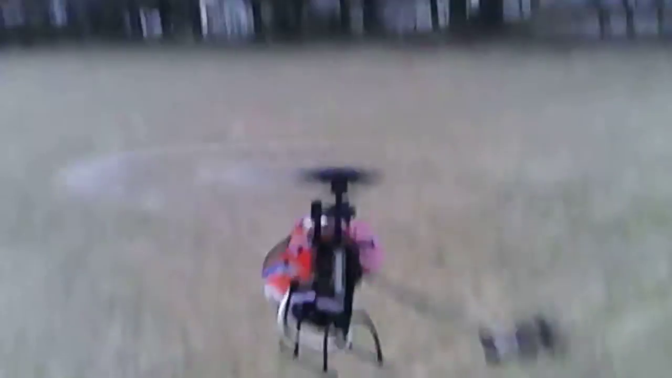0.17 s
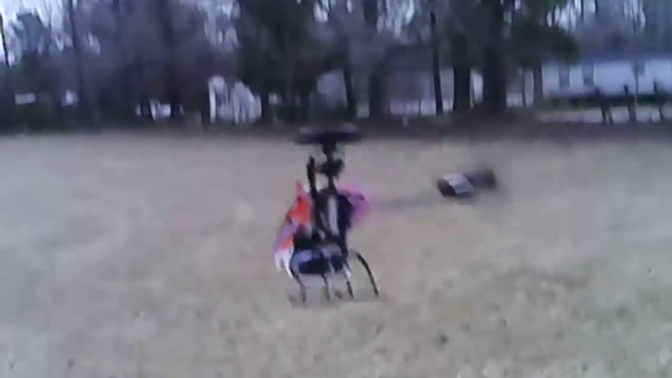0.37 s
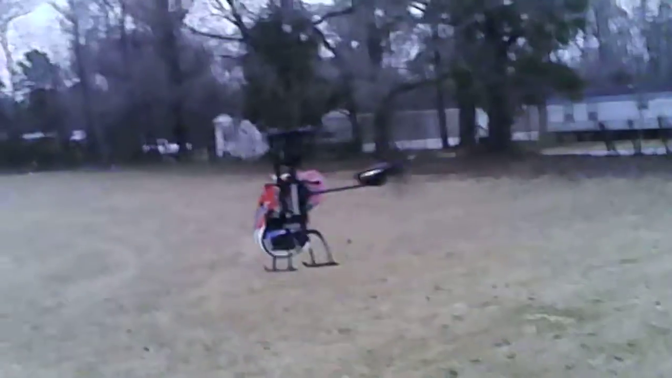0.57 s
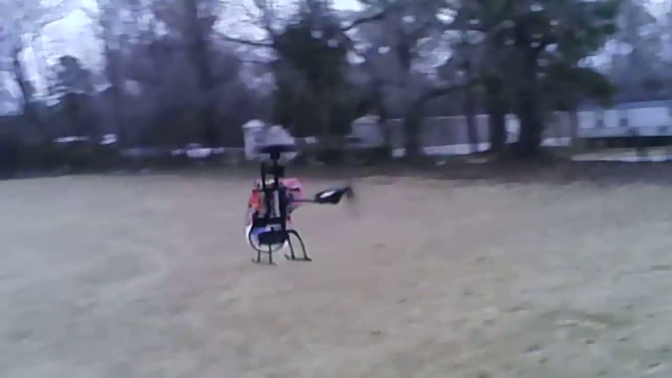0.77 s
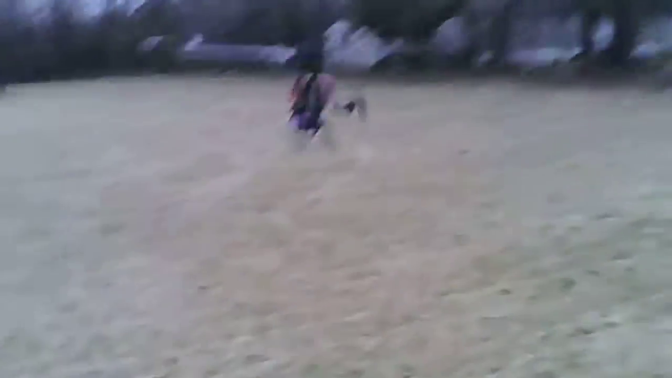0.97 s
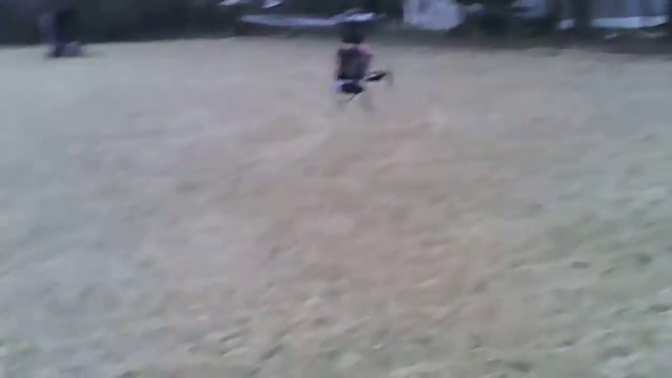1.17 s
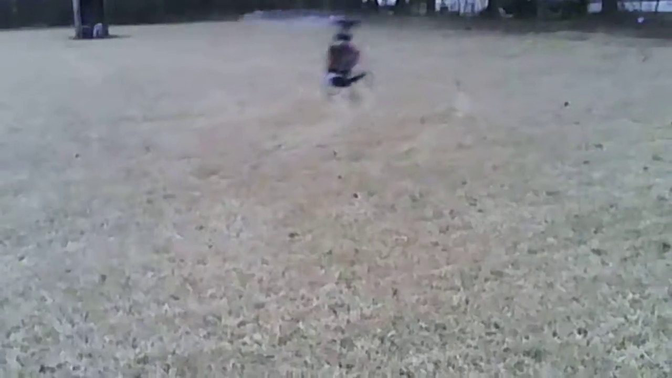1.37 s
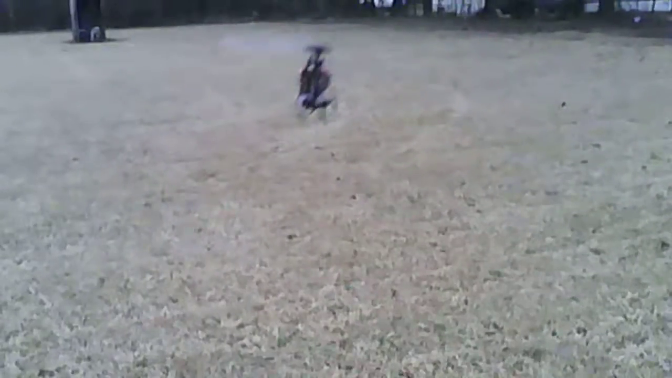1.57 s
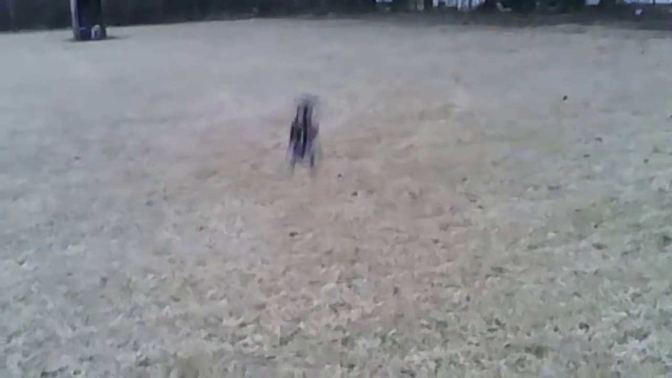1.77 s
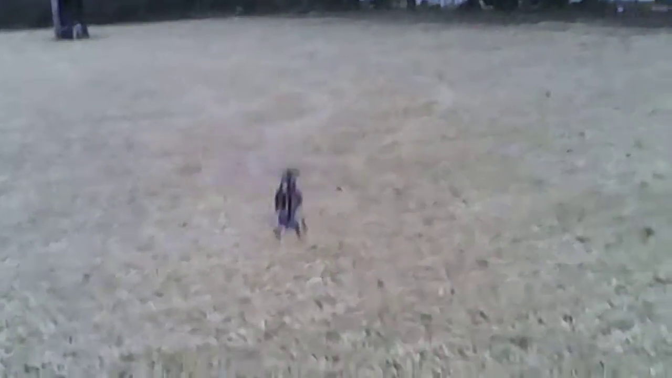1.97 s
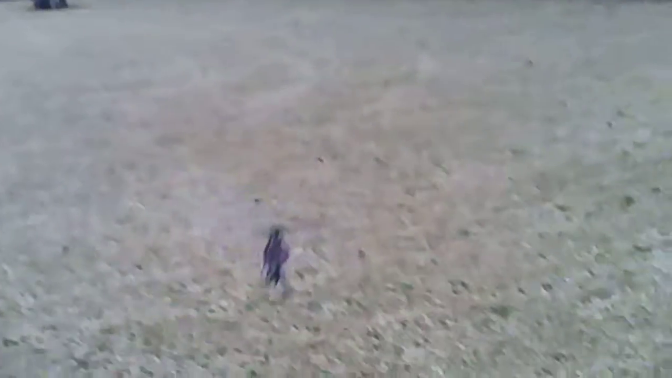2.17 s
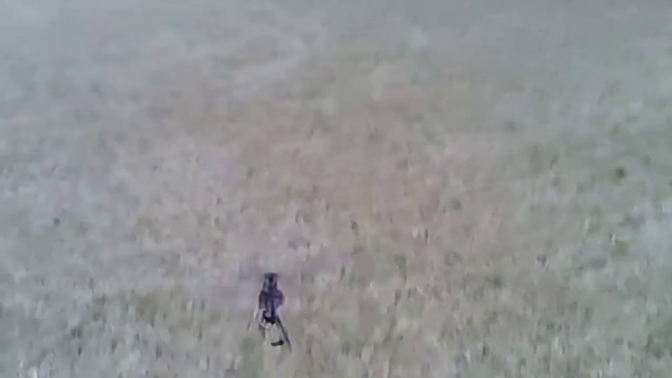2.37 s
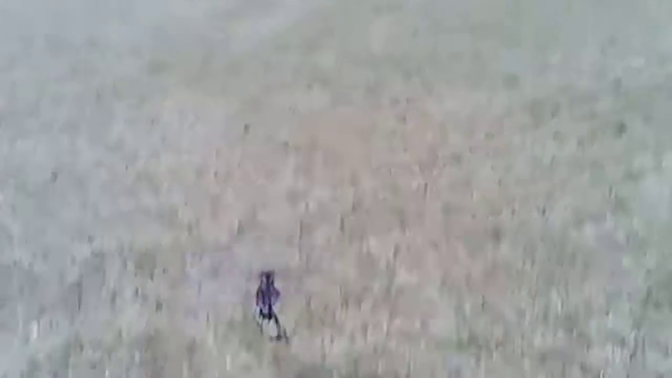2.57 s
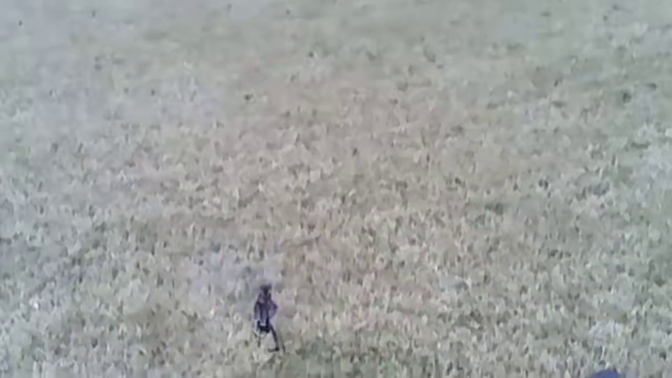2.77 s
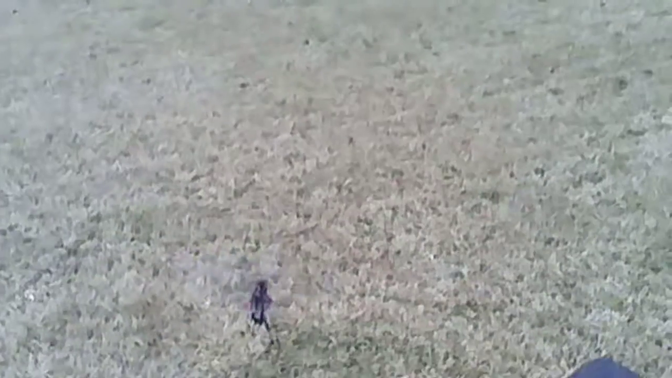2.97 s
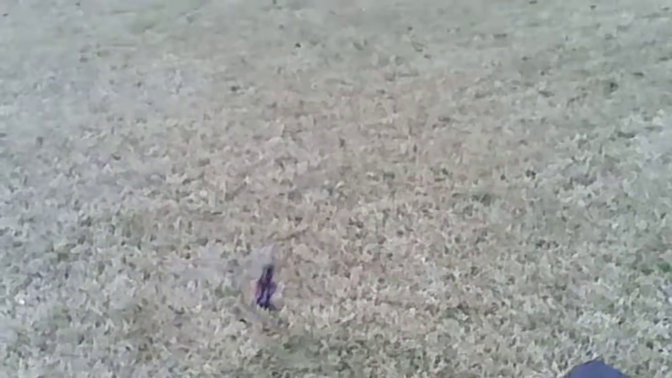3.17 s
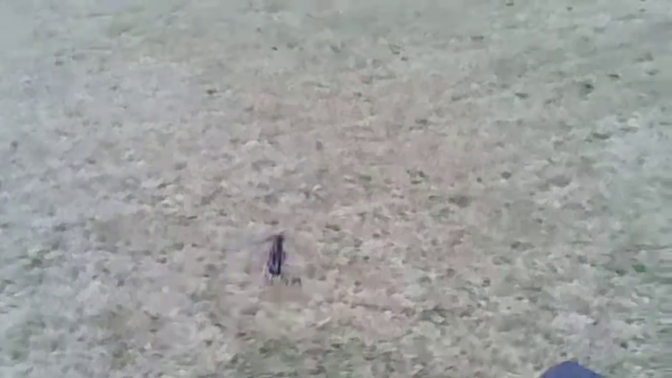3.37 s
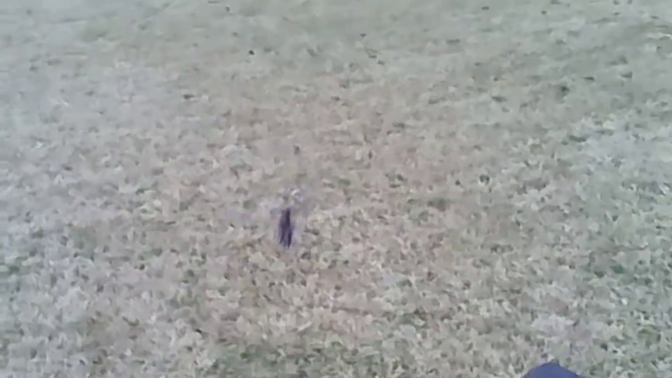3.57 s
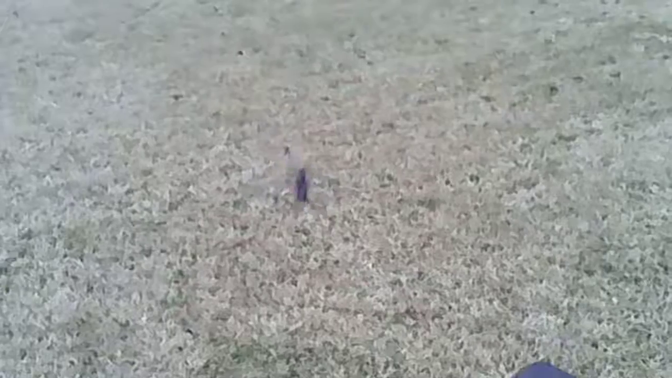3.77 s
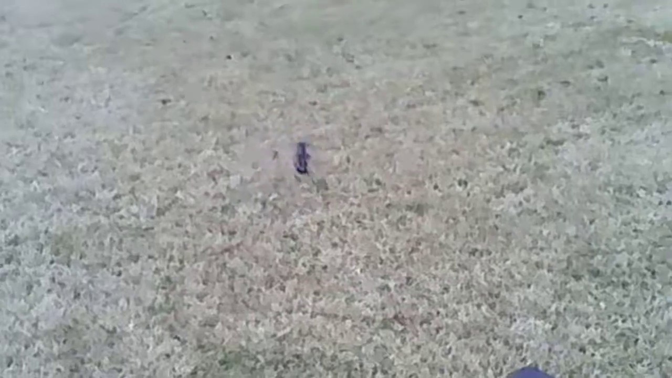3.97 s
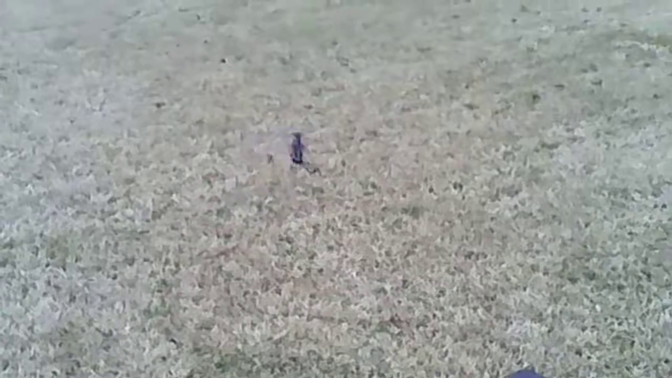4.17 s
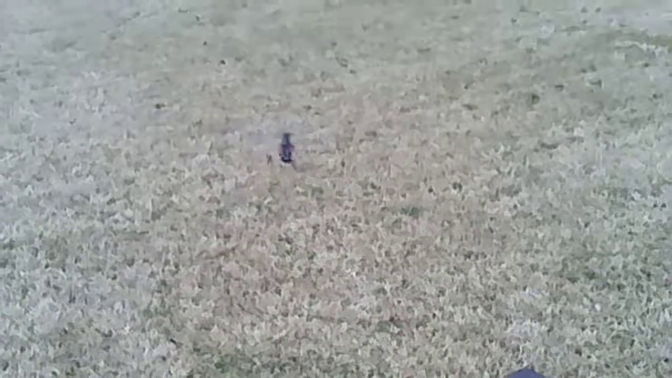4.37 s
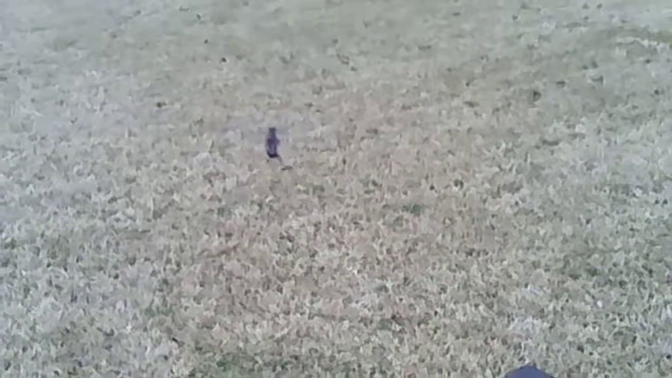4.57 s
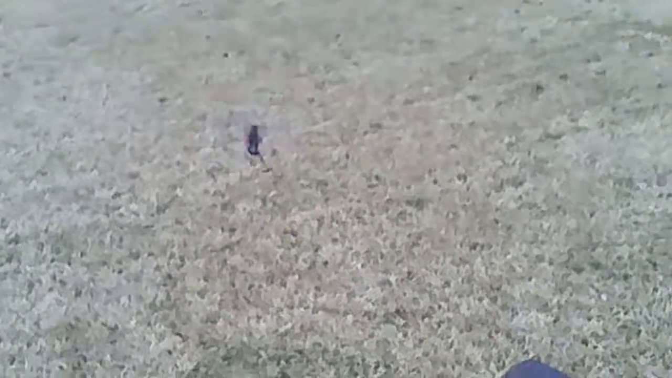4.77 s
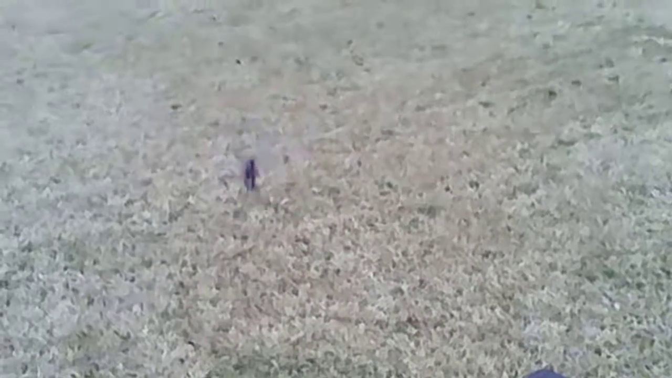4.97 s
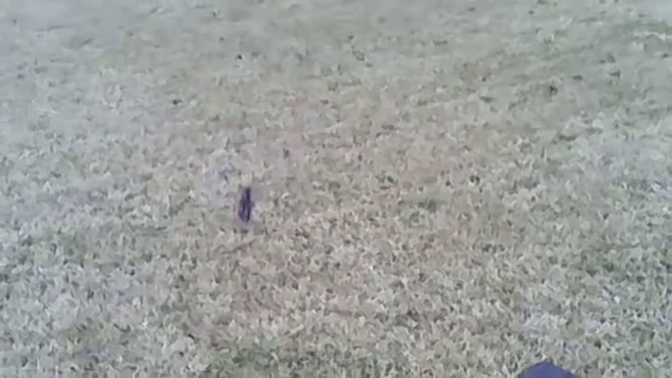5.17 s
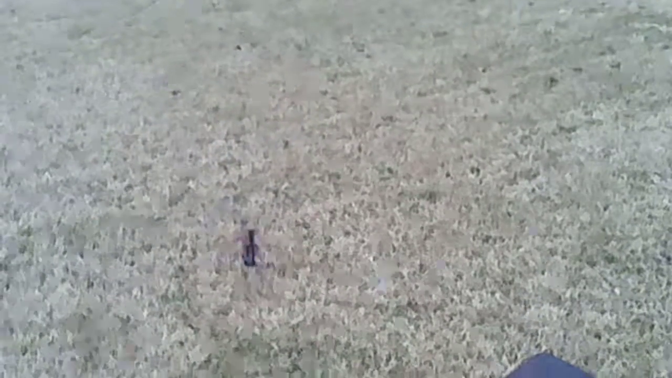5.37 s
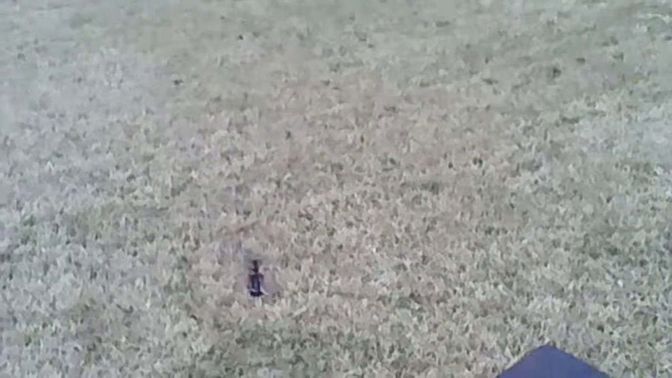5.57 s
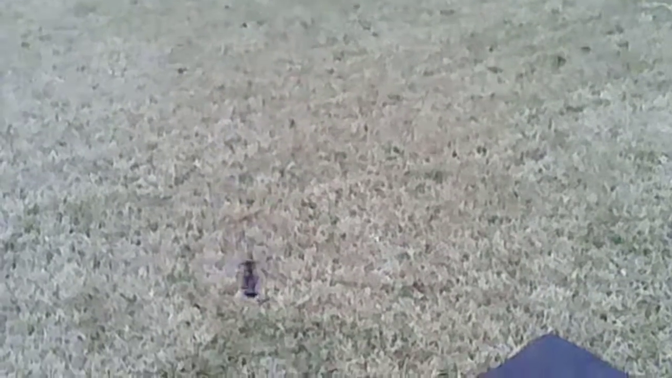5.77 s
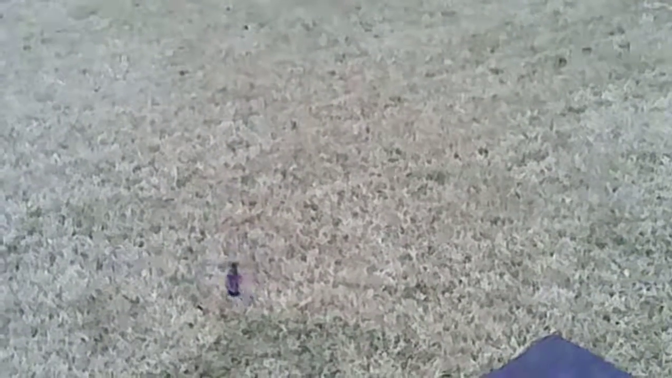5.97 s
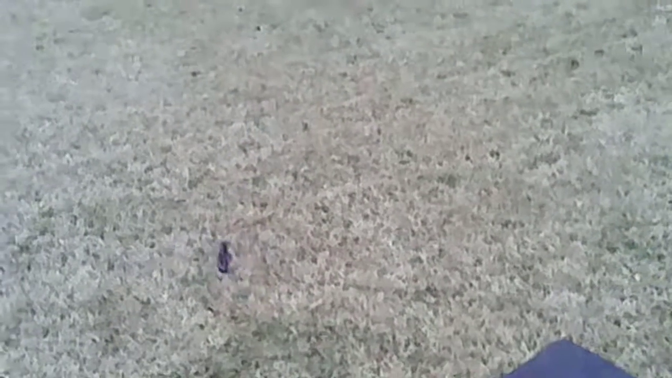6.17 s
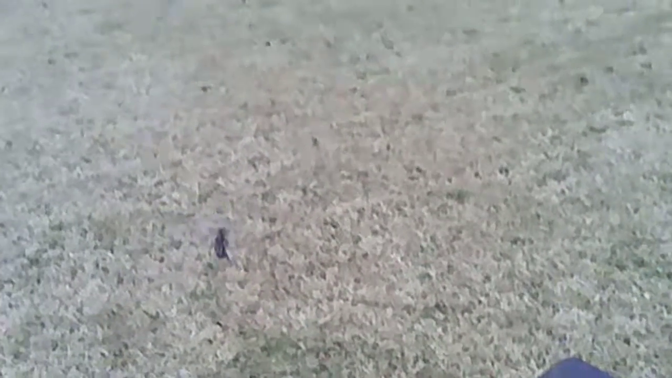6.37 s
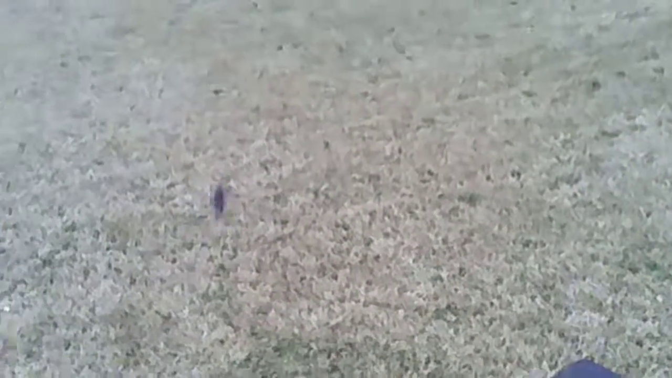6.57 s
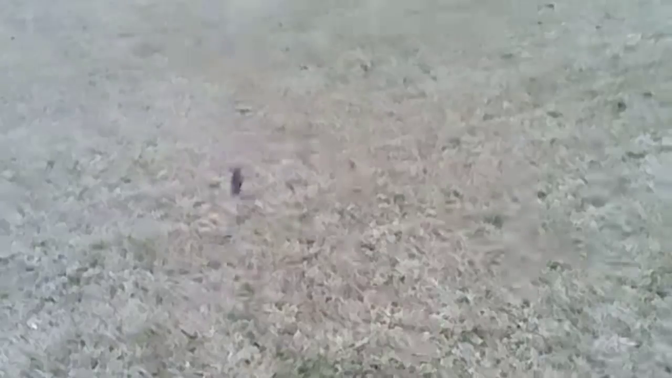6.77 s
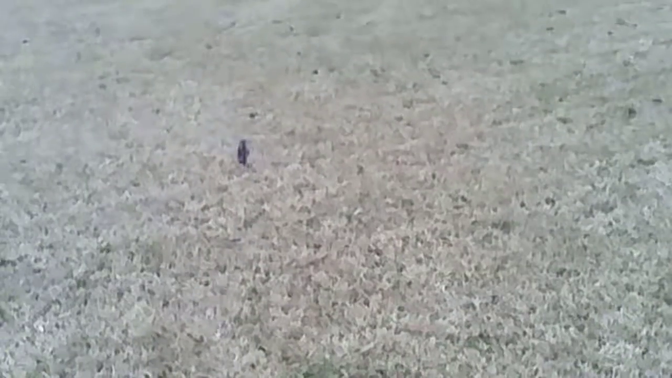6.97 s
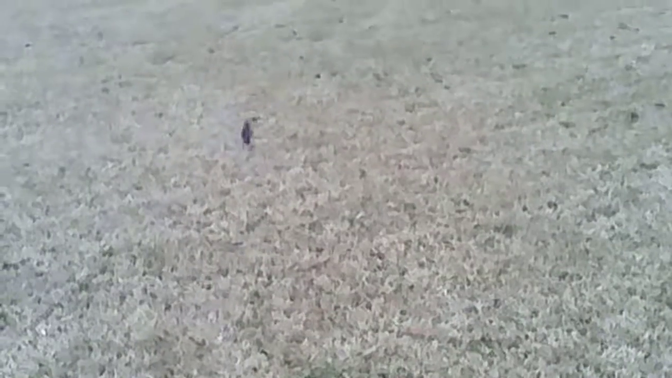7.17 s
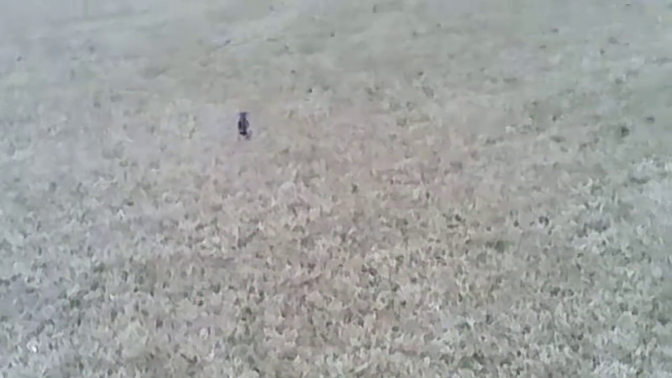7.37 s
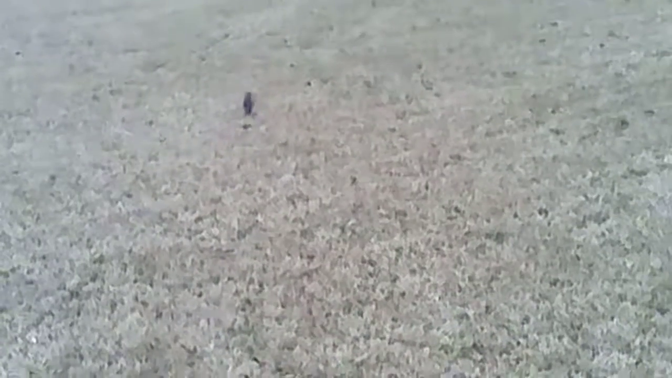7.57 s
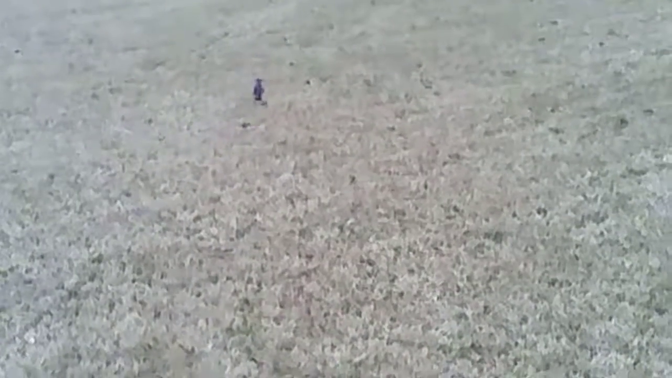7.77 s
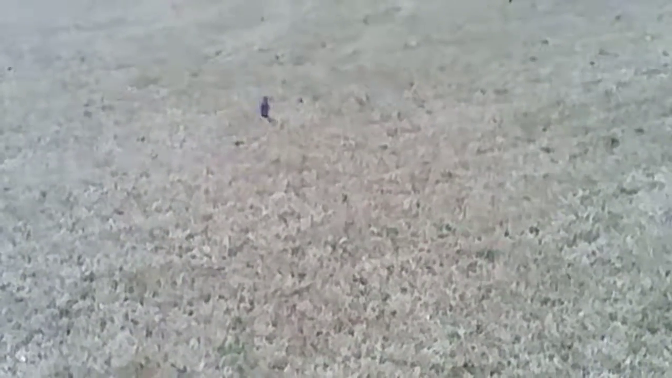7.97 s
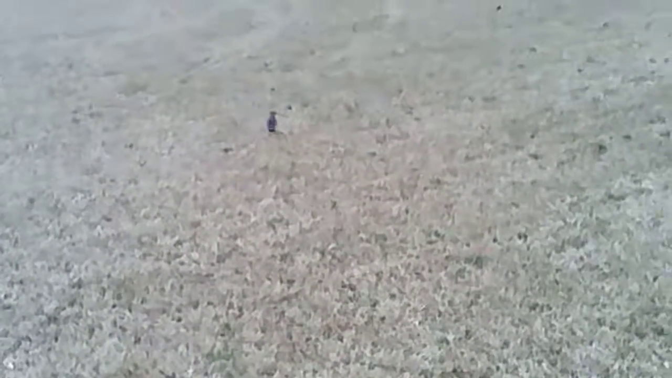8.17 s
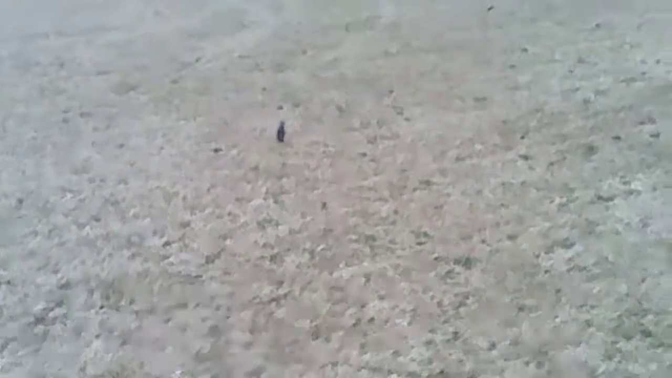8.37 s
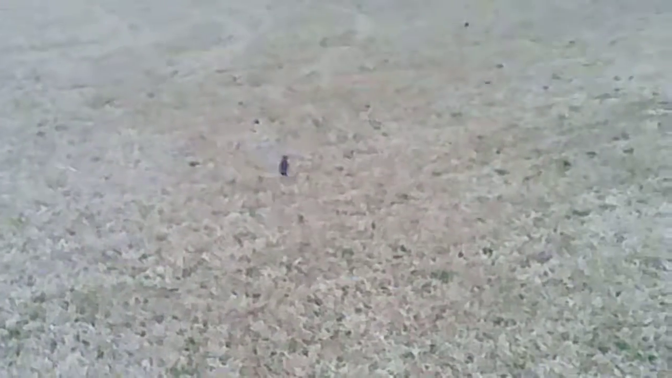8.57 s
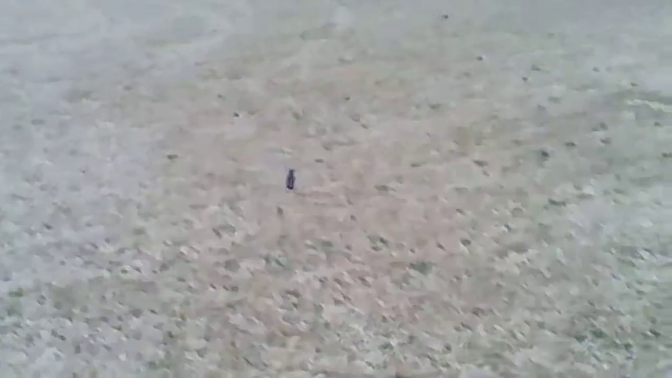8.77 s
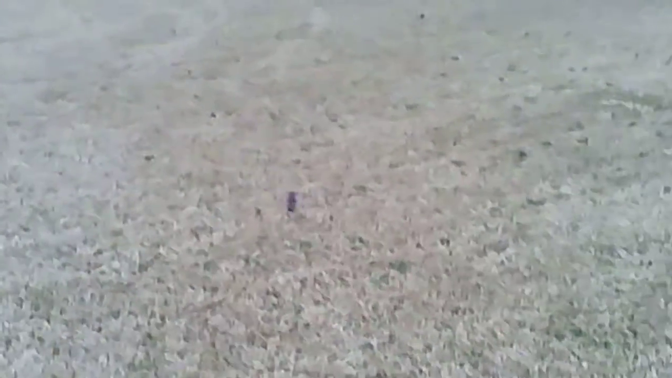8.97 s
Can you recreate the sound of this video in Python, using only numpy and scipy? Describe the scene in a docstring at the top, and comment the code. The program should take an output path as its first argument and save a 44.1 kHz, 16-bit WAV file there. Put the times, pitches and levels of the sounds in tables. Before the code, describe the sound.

The fluttering whine of a little model helicopter recedes over a lawn, with rushes of blade noise and scattered hollow knocks nearby.

```python
"""A small electric model helicopter hovers 0.7 m away over a lawn, against a faint outdoor wash and hum.
From the start its motor sings, turning eight times per rotor turn, and an off-centre 64-tooth gear
whines, flutters and rasps. The blades roar whenever it sinks into its own wake: at the outset, then
loudest at 2-3 s as it backs away. Hollow knocks sound nearby, one early and the rest from 2.4 to 5.3 s.
After hanging still near 3 m, the craft drifts off to 5 m and dips into its wake again."""
import sys
import numpy as np
from scipy import signal
from scipy.fft import rfft, irfft, next_fast_len
from scipy.io import wavfile
from scipy.ndimage import uniform_filter1d

SR = 44100
rng = np.random.default_rng(int(sys.argv[2]) if len(sys.argv) > 2 else 0)


def to_wav(s):
    """Save 16-bit WAV."""
    ch = np.atleast_2d(s).T  # columns
    pcm = np.round(np.clip(ch, -1, 1) * 32767)  # PCM
    wavfile.write(sys.argv[1], SR, pcm.astype(np.int16))


N = 397341
TIME = np.arange(N) / SR
GEAR_TEETH, MOTOR_STEPS = 64, 24  # tooth contacts and torque ripples per rotor turn

# directivity of the ringing frame toward the listener: t/s, gain/dB
FRAME_DIRECTIVITY = [(.3, 4), (1.1, -5.5), (2.6, -9.5), (3.1, -3), (3.55, -5), (4.1, -13), (4.8, -15),
                     (5.35, -3), (6.2, -3), (6.55, -6), (7.4, -11), (8.8, -3)]


def amp(db):
    """Decibel law: 20 dB is a factor of ten in amplitude."""
    return 10 ** (np.asarray(db) / 20)


def unit(x):
    """Normalisation to rms 1."""
    return x / np.sqrt(np.mean(x ** 2) + 1e-20)


def curves(rows):
    """Linear interpolation in time of each column after the first."""
    times, *columns = np.transpose(rows)
    return [np.interp(TIME, times, column) for column in columns]


def beam(rows):
    """Directivity: the gain toward the listener changes as the craft turns and tilts."""
    return amp(curves(rows)[0])


def colour(x, spectrum):
    """Spectral shaping by rows of f/Hz, gain/dB; the result has rms 1."""
    size = next_fast_len(N, real=True)
    hz, db = np.transpose(spectrum)
    bins = np.fft.rfftfreq(size, 1 / SR)
    gain = amp(np.interp(np.log(bins + 1), np.log(hz), db))
    return unit(irfft(rfft(x, size) * gain, size)[:N])


def wander(bandwidth_hz):
    """Random fluctuation: low-passed Gaussian noise of rms 1."""
    grid = np.linspace(0, TIME[-1], num=4096)
    spectrum = rfft(rng.standard_normal(len(grid)))
    spectrum *= np.exp(-(np.arange(len(spectrum)) / TIME[-1] / bandwidth_hz) ** 2)
    return np.interp(TIME, grid, unit(irfft(spectrum)))


def around(pattern, turns):
    """Periodic interpolation of a pattern that runs once round a wheel."""
    return np.interp(turns % 1, np.linspace(0, 1, len(pattern) + 1), np.append(pattern, pattern[0]))


def roughness(turns, points, steps):
    """Surface roughness: a band-limited random profile that recurs with each turn."""
    return around(unit(signal.resample(rng.standard_normal(points), steps)), turns)


def slack(turns, width):
    """Eccentricity: 1 where the off-centre gear lets go of the pinion, near 0 where it grips."""
    return np.exp(-((turns % 1 - .5) / width) ** 2)


def far_hum(hz=101.8, level_db=-58.5):
    """Random amplitude and frequency modulation make a distant low hum waver."""
    gain = amp(level_db + 1.6 * wander(5))
    return gain * unit(np.sin(2 * np.pi * np.cumsum(hz + 2.51 * wander(4)) / SR))


def outdoors(rumble_db=-51):
    wash_levels = [(0, -42.5), (3, -43), (9, -40)]  # level of the wash under rising gain: t/s, level/dB
    wash_spectrum = [(150, -13.5), (380, -10), (560, -6.5), (800, 2), (1020, 1.5), (1300, -2.5), (1750, -2),
                     (2300, -9), (2750, 0), (3200, -17.5), (4000, -18), (7000, -18), (12000, -38)]  # its spectral density: f/Hz, relative level/dB
    rumble_spectrum = [(10, 2), (45, 2), (75, 0.5), (103, -0.5), (140, -5), (220, -13), (500, -37),
                       (2000, -60)]  # that of the rumble: f/Hz, relative level/dB
    wash_db, = curves(wash_levels)
    wash = amp(wash_db + .5 * wander(8.6)) * colour(rng.standard_normal(N), wash_spectrum)
    rumble = amp(rumble_db + .71 * wander(3.6)) * colour(rng.standard_normal(N), rumble_spectrum)
    return wash + rumble


def impacts(bounce_s=.021):
    """Rebound: yields (t/s, level/dB, pitch factor) for knocks and their ever softer, lower bounces."""
    strikes = [(.168, -23.5, 1.02, 0), (2.374, -29, 0.88, .03), (2.47, -25, .96, 0), (3.917, -25, 1.1, .05),
               (4.728, -36.5, 0.48, 0), (5.041, -29, 3.2, 0), (5.249, -21.5, 1.08, .035),
               (5.324, -21, 0.98, .075)]  # knocks and ticks: t/s, level/dB, pitch factor, rattle length/s
    for start, db, pitch, rattle_s in strikes:
        yield start, db, pitch
        for delay in np.arange(bounce_s, rattle_s, bounce_s):
            yield start + delay, db - 5.5 - 45 * delay, pitch * (1 - .9 * delay)


def knocks(crack_db=-21, crack_s=.004):
    """Modal decay: a small hollow body cracks and rings when struck; higher knocks die sooner."""
    modes = [(260, -19.5, 0.043), (500, -37, 0.017), (960, -15, 0.018), (1285, -4, 0.086), (1380, -7, .03),
             (2600, -9, .012), (3150, -9, 0.011)]  # resonances of the body: f/Hz, relative level/dB, T60/s
    out, t = np.zeros(N), np.arange(SR // 8) / SR
    for start, db, pitch in impacts():
        ring = sum(amp(mode_db - 60 * t * pitch / t60) * np.sin(2 * np.pi * hz * pitch * t)
                   for hz, mode_db, t60 in modes)
        dull_noise = unit(uniform_filter1d(rng.standard_normal(len(t)), size=9))
        crack = amp(crack_db) * np.exp(-t / crack_s) * dull_noise
        out[round(start * SR):][:len(t)] += amp(db) * (ring + crack)
    return out


def tail_propeller():
    """Blade-passing tone of the tail propeller, whose own motor hunts in speed to hold the heading."""
    tone_track = [(.1, 555, -56), (.65, 514, -48.5), (1.05, 500, -58), (1.8, 512, -61), (2.3, 500, -54),
                  (2.9, 545, -60), (3.5, 525, -70), (4.6, 520, -56.5), (5.4, 530, -73)]  # blade-passing tone: t/s, f/Hz, level/dB
    hz, db = curves(tone_track)
    gain = amp(db + 2.4 * wander(21))
    return gain * unit(np.sin(2 * np.pi * np.cumsum(hz + 3 * wander(14.4)) / SR))


def wake_envelope(calm_db=-57, release_s=.056):
    """Exponential growth and decay: each surge builds, holds, then drops quickly in clean air."""
    dips = [(0, 0.52, -41, .05), (2.3, 0.35, -36.5, .45), (2.82, 0.28, -35, 0.25), (3.96, 0.37, -43, .06),
            (5.24, .1, -45.5, 0.14), (8.2, 0.16, -41.5, 0.25), (8.598, 0.43, -45.5, 0.29)]  # dips into the wake: t/s at full roar, hold/s, level/dB, rise/s
    gain = np.full(N, amp(calm_db))
    for start, hold_s, db, rise_s in dips:
        before, after = np.maximum(start - TIME, 0), np.maximum(TIME - start - hold_s, 0)
        gain = np.maximum(gain, amp(db) * np.exp(-before / rise_s - after / release_s))
    return gain


def wake_roar(turns, chop=.057, slap=.16, ragged_db=.7):
    """Blade-wake interaction: ragged bursts of air and a hum at three times the blade rate."""
    roar_spectrum = [(200, -18.5), (600, -11.5), (1000, -6), (1700, -9.5), (2200, -0.5), (2750, 3),
                     (3400, -1), (4200, -2), (5000, -18.5), (7000, -19)]  # chopped wake: f/Hz, relative level/dB
    pulsing = (1 + chop * np.cos(2 * np.pi * turns)) * (1 + slap * np.cos(4 * np.pi * turns))
    bursts = pulsing * amp(ragged_db * wander(150))
    hum = amp(-21 + 2.5 * wander(8)) * np.cos(2 * np.pi * 6 * turns + .4 * wander(15))
    return wake_envelope() * (colour(bursts * rng.standard_normal(N), roar_spectrum) + hum)


def blade_swish(turns, swish_db=-36.5, hum_db=-51.5, chop=.24):
    """Turbulence noise pulses as each of the two blades passes, over their blade-passing tone."""
    swish_spectrum = [(60, -3.5), (110, 3), (170, -9.5), (330, -12), (600, -5), (950, -3.5), (1400, -0.5),
                      (1900, -4), (2750, -0.5), (3300, -1.5), (4200, -2.5), (6000, -27)]  # turbulent air: f/Hz, relative level/dB
    passing = np.cos(4 * np.pi * turns)
    swish = colour(rng.standard_normal(N) * (1 + chop * passing), swish_spectrum)
    return amp(swish_db) * swish + amp(hum_db) * passing


def shaft_tones(turns, orders, levels_db):
    """Rotational harmonics: tones locked to the shafts, each fading in and out as the craft tilts."""
    tones = np.zeros(N)
    for order, db in zip(orders, levels_db):
        fade_db = 1.3 * wander(2) + .8 * wander(30)
        tones += amp(db + fade_db) * unit(np.cos(2 * np.pi * (order * turns + rng.random())))
    return tones


def drive_whistles(turns, metres, gain_db=8.5, falloff=.78):
    """Power-law attenuation: the drive's thin whistles fade more slowly than 1/r and carry farther."""
    orders = [112, 120, 144, 152, 161, 184, 192]  # whistles: multiples of the rotor speed
    levels = [-66, -58, -56, -51.5, -50.5, -56, -57]  # their strengths: relative level/dB
    return amp(gain_db) / metres ** falloff * shaft_tones(turns, orders, levels)


def motor_overtones(turns, level_db=-28):
    """Structure-borne sound: motor overtones leave through the frame, with half its directivity in dB."""
    orders = [8, 32, 48, 72, 80, 88, 128, 136]  # overtones: multiples of the rotor speed
    levels = [-23, -26, -24, -24, -24, -23, -14.5, -10]  # their strengths: relative level/dB
    return amp(level_db) * np.sqrt(beam(FRAME_DIRECTIVITY)) * shaft_tones(turns, orders, levels)


def motor_throb(turns, level_db=-46.5):
    """Sidebands: the changing load rocks the motor in its mount, radiating in every direction."""
    rocking = np.cos(2 * np.pi * turns) + .84 * np.sin(4 * np.pi * turns)
    return amp(level_db) * unit(rocking * np.sin(2 * np.pi * MOTOR_STEPS * turns))


def motor_tone(turns, level_db=-28, lag_cycles=.049, shake=.039):
    """Torque ripple: the motor's tone weakens and lags whenever the gear goes slack."""
    directivity = [(0, -5.5), (.8, -2.5), (1.9, -5.5), (2.25, -13), (2.58, -5.5), (3.3, -2), (3.6, -12.5),
                   (4.5, -8), (5.17, -11.5), (5.3, -7.5), (5.6, -1.5), (5.85, -8.5), (6.17, -1), (7, -5),
                   (7.4, -13), (8, -7), (8.6, -16)]  # radiation toward the listener, with deep nulls: t/s, gain/dB
    cycles = MOTOR_STEPS * turns - lag_cycles * slack(turns + .12, width=.31) + .0053 * wander(40)
    load = 1 - .62 * slack(turns - .04, width=.18)
    ripple = load * (1 + shake * wander(40)) * np.cos(2 * np.pi * cycles)
    return amp(level_db) * beam(directivity) * unit(ripple)


def tooth_scrape(turns, drift=.77, grit_share=.52):
    """Sliding friction: tooth flanks scrape in a slowly shifting pattern, with fresh grit on each pass."""
    unevenness = around(unit(rng.uniform(-1, 1, GEAR_TEETH)), turns)
    force = amp(2.6 * unevenness - slack(turns, width=.14))
    front, back = (roughness(turns, points=512, steps=8192) for _ in range(2))
    aspect = drift * (wander(1.16) + TIME / 2)
    flanks = front * np.cos(aspect) + back * np.sin(aspect)
    return force * (np.sqrt(1 - grit_share) * flanks + np.sqrt(grit_share) * rng.standard_normal(N))


def gear_rasp(turns, rasp_db=-28, frame_db=-33):
    """Forced vibration: the scrape of the teeth is heard as a rasp and also rings the frame."""
    rasp_spectrum = [(1500, -38), (3800, -23.5), (4500, -13), (5200, -23), (5600, -15), (6400, -18.5),
                     (7200, -3), (8400, -11.5), (9200, -0.5), (10000, 2), (10600, 3), (11200, -3),
                     (11700, -13), (12000, -30), (12300, -40)]  # scraping teeth: f/Hz, relative level/dB
    frame_response = [(4700, -36), (5250, -36), (5600, -10.5), (6300, -41), (6900, -31), (7300, -6),
                      (7750, 5), (8000, -3), (8400, -8), (9200, -22.5)]  # frame resonances: f/Hz, relative level/dB
    scrape = tooth_scrape(turns)
    ring = amp(frame_db) * beam(FRAME_DIRECTIVITY) * colour(scrape, frame_response)
    return amp(rasp_db) * colour(scrape, rasp_spectrum) + ring


def gear_whine(turns, level_db=-26.5, slack_turns=.13, rebound=.047, skew=.45):
    """Modulated mesh tone: once a turn the teeth let go and it drops out, returns sharp and slides down."""
    directivity = [(0, -3.5), (.3, 1.3), (.55, -1.5), (.85, -1.1), (1.15, -4), (2, -3.5), (2.35, -1.5),
                   (2.8, -4.3), (3.65, -4.5), (3.9, -2.5), (5.35, -2), (5.75, -4.5), (6.3, -4.5),
                   (7.15, -1.1), (7.95, -5), (8.2, -0.5), (8.45, -3.5), (8.6, 3), (8.75, -3), (8.95, 2)]  # radiation toward the listener: t/s, gain/dB
    offset = (turns % 1 - .5) / slack_turns
    depth = 1.08 + .12 * wander(2)
    # complex envelopes carry both amplitude and phase
    grip = 1 - slack(turns, slack_turns) * (depth * (1 - rebound * offset ** 2) + 1j * skew * offset)
    bite_strength = (.42 + .24 * wander(2)) * slack(turns - .2, width=.11)
    bite = bite_strength * np.exp(2j * np.pi * 3 * (turns - .72))  # three orders above the mesh tone
    tooth_errors = .08 * roughness(turns, points=12, steps=256)
    shake = .085 * (wander(130) + 1j * wander(130))
    mesh = (grip + bite + tooth_errors + shake) * np.exp(2j * np.pi * GEAR_TEETH * turns)
    return amp(level_db) * beam(directivity) * unit(mesh.real)


def scene():
    """Spherical spreading: gear, motor and blade swish, driven by one rotor angle, fall off as 1/r."""
    rotor_speed = [(0, 56.75), (.25, 57.05), (.45, 57.04), (.85, 57.49), (1.3, 57.5), (2, 58.32),
                   (2.8, 57.05), (3.4, 57.02), (3.68, 56.68), (4.33, 57.62), (4.72, 57.12), (5.1, 57.35),
                   (5.6, 56.72), (6.3, 57), (6.5, 56.75), (6.85, 57.17), (8, 57.53), (9.01, 57.4)]  # rotation rate of the rotor: t/s, f/Hz
    flight_path = [(0, 0.7), (.45, 0.9), (.65, 1.13), (1.3, 1.28), (2, 1.63), (3.9, 2.68), (5.9, 2.8),
                   (8.6, 4.9)]  # range from the listener: t/s, r/m
    speed_hz, = curves(rotor_speed)
    metres, = curves(flight_path)
    turns = np.cumsum(speed_hz + .0296 * wander(9.5)) / SR
    gear = gear_rasp(turns) + gear_whine(turns)
    motor = motor_tone(turns) + motor_throb(turns) + motor_overtones(turns)
    whistles = drive_whistles(turns, metres)
    craft = (gear + motor + blade_swish(turns)) / metres + whistles + wake_roar(turns) + tail_propeller()
    return (craft + knocks() + outdoors() + far_hum())[None]


def record(dry, cutoff_hz=12300):
    """Band limiting: a linear-phase low-pass filter removes the highest treble."""
    low_pass = signal.firwin(1023, cutoff_hz, window=("kaiser", 9), fs=SR)
    return signal.oaconvolve(dry, low_pass[None], "same")


dry = scene()
out = record(dry)
to_wav(out)
```